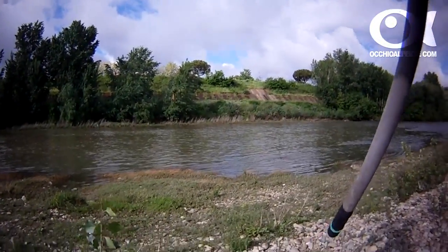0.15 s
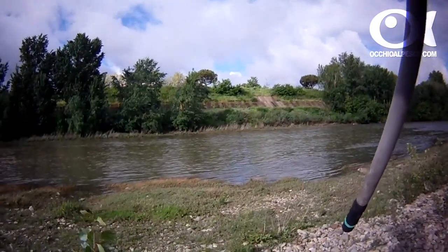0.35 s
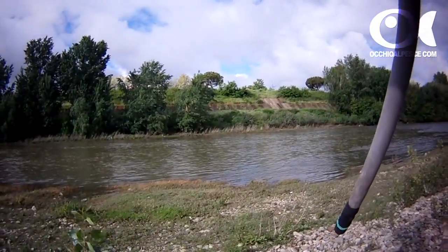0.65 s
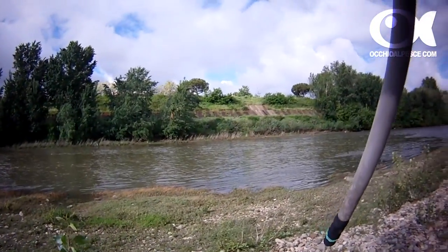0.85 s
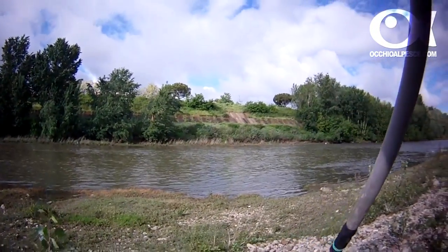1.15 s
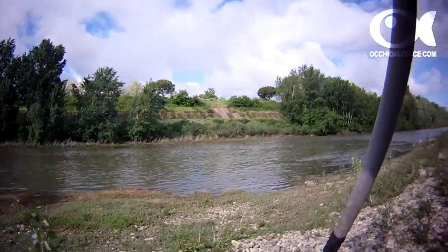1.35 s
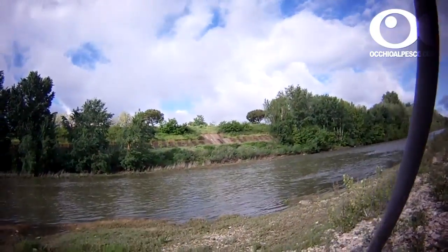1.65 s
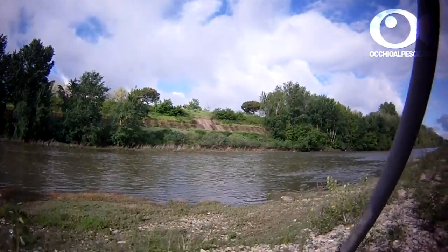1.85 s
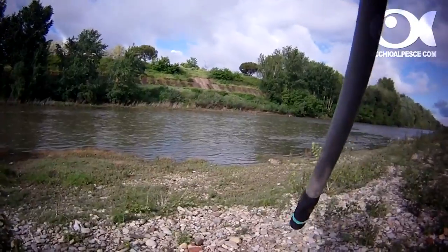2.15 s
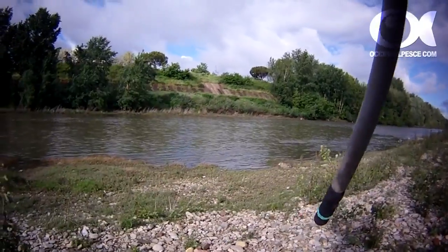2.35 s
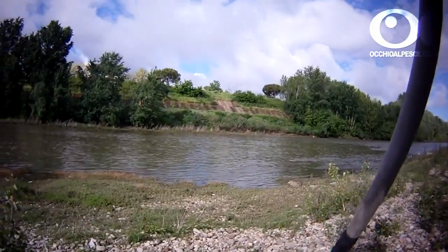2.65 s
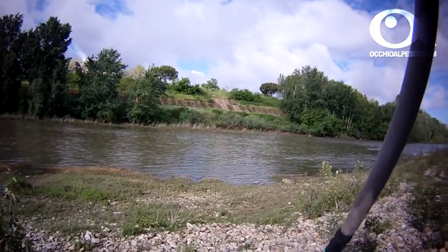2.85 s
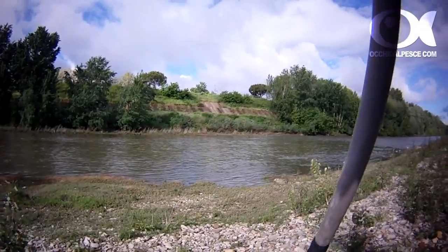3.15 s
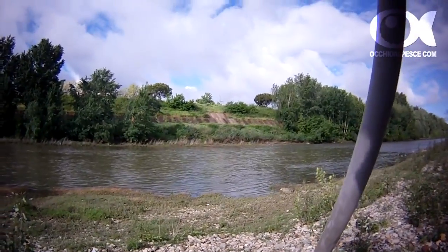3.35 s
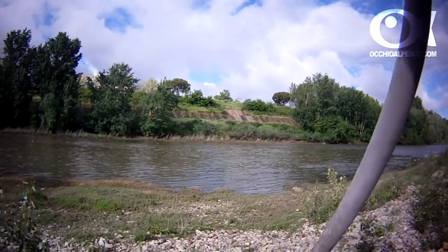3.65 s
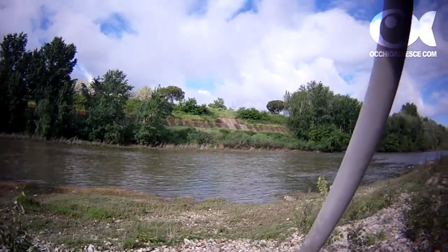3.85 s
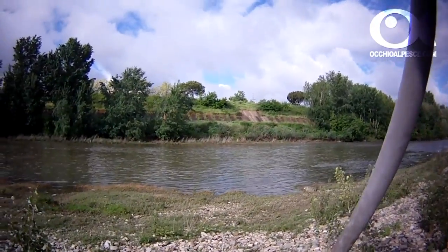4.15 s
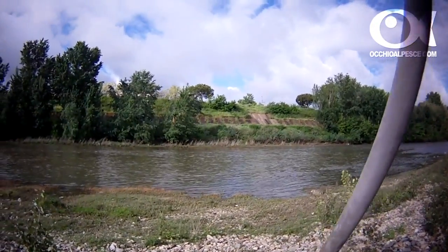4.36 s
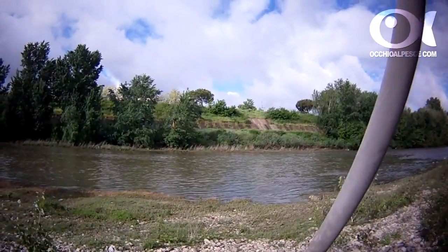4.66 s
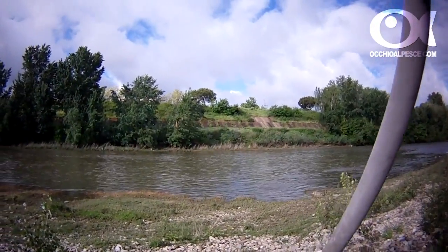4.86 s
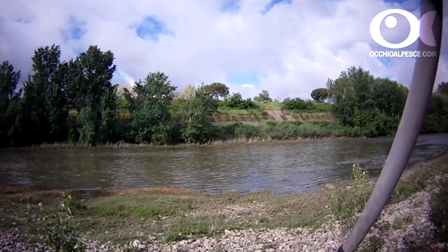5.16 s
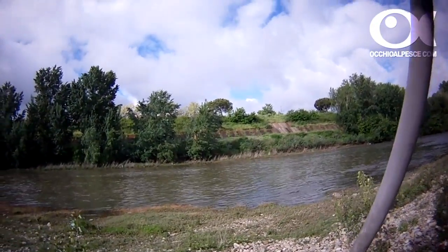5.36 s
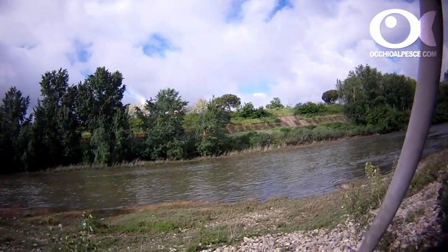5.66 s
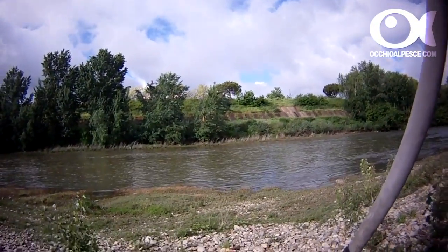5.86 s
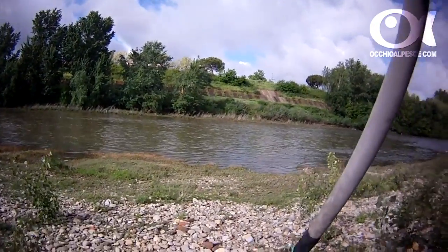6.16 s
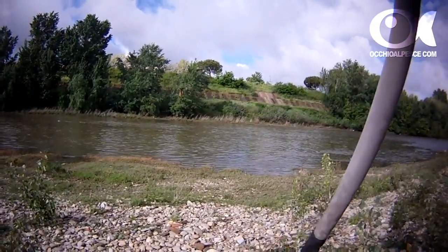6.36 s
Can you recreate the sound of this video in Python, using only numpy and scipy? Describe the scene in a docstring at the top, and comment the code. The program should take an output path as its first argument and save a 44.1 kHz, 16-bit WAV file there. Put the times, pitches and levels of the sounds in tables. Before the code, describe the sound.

Someone shuffles on a pebbly riverbank close to a hand-held microphone. Soles crunch through gravel in irregular bunches, stones clack together and soft footfalls thud, loudest early on and again near the end. Behind them a river murmurs steadily and a small bird whistles in the distance. Light puffs of air touch the microphone, over a faint electronic whine and hiss.

```python
"""A pebbly riverbank, where someone shifts and steps close to a small hand-held camera.
Up front, soles crunch through gravel in bunches of tiny slips, pebbles clack and chatter, and soft
footfalls thud, all coloured by the camera's housing. Behind, the river murmurs and a small bird
whistles far off. Air puffs lightly on the microphone; the electronics whine and hiss faintly."""
import sys
import numpy as np
from scipy import signal
from scipy.fft import rfft, irfft, next_fast_len
from scipy.io import wavfile
from scipy.ndimage import map_coordinates

SR = 44100
rng = np.random.default_rng(int(sys.argv[2]) if len(sys.argv) > 2 else 0)


def output_pcm(signal):
    """Save a mono or channel-first signal as 16-bit PCM at the path in sys.argv[1].

    Samples are clipped to [-1, 1] before scaling.
    """
    pcm = np.clip(np.atleast_2d(signal).T, -1, 1) * 32767
    wavfile.write(sys.argv[1], SR, np.round(pcm).astype(np.int16))


N = 287091

# Table levels are relative: each layer sets its own trim.
# partials of the electronic whine: f/Hz, level/dB
WHINE_PARTIALS = [(7777, -86), (7837, -75), (7867, -84), (7897, -79.5), (7957, -92.5), (11090, -84)]
# tone of the current: f/Hz, level/dB
RIVER_EQ = [(20, -5), (60, -13), (150, -9.5), (330, -7), (480, -5.5), (720, -8), (1200, 3.5), (2100, -5),
            (2600, 0.5), (3000, -2), (3400, 1), (4200, -1), (4900, 1), (6500, -9), (7600, -6.5),
            (9000, -17), (15000, -33)]
# tone of air on the microphone: f/Hz, level/dB
AIR_EQ = [(12, 0.5), (35, -10.5), (90, -24.5), (300, -35), (1000, -100)]
# puffs of air: middle t/s, length/s, level/dB
AIR_PUFFS = [(0.124, 0.26, -68.5), (1.376, 0.195, -63), (1.758, .1, -74), (2.15, 0.5, -75),
             (3.8, 0.22, -72), (5.945, 0.051, -63), (6.073, .14, -61), (6.36, .2, -74.5)]
# bird whistles: start t/s, length/s, start f/Hz, end f/Hz, level/dB
BIRD_NOTES = [(.46, 0.147, 2900, 2806, -69), (0.922, 0.202, 1776, 1905, -69),
              (1.997, 0.04, 2910, 2821, -62), (3.312, 0.048, 4050, 3950, -65),
              (3.742, .06, 3186, 3310, -63), (3.83, .036, 4150, 3800, -63),
              (3.866, 0.059, 3070, 2710, -63.5), (4.007, 0.059, 3400, 3190, -56.5),
              (4.276, 0.0505, 4067, 3680, -62), (4.305, .06, 3750, 4380, -63),
              (4.403, 0.063, 3600, 3170, -58), (4.518, 0.087, 4400, 3334, -57.5),
              (4.808, 0.0355, 2680, 2680, -62), (4.946, 0.043, 4250, 3230, -57),
              (5.015, 0.078, 2600, 2870, -57.5), (5.459, 0.034, 3624, 3200, -59.5),
              (5.513, 0.077, 2660, 2890, -57.5)]
# resonances of the camera housing: f/Hz, width/Hz, level/dB
HOUSING_PEAKS = [(472, 55, -1), (919, 93, 1), (1272, 460, -2), (1594, 166, 0), (2588, 310, -4),
                 (3339, 104, 3.5), (3670, 290, -2.5), (4900, 530, -0.5), (5720, 740, -10.5),
                 (6960, 540, -12.5), (7900, 250, -11.5)]
# the ground thudding under a heel: f/Hz, level/dB, t60/s
GROUND_MODES = [(101.2, -6, 0.041), (172, 2.5, 0.03), (233, 0.5, 0.031)]
# the housing's hollow ring after a footfall: f/Hz, level/dB, t60/s
HOLLOW_MODES = [(467.6, -3, 0.049), (586.7, -8.5, 0.028), (918, -15, 0.042)]
# soft footfalls: t/s, thud level/dB, hollow ring level/dB
FOOTFALLS = [(.948, -69, -53.5), (1.076, -56, -70), (1.113, -49.5, -39.5), (1.23, -45.5, -62),
             (1.753, -54, -54), (2.048, -50, -41.5), (2.192, -47, -55), (2.22, -53, -49), (2.562, -53, -52),
             (2.707, -53, -49), (2.817, -51, -53), (3.036, -49, -41), (3.962, -52, -57), (4.112, -55, -54),
             (4.189, -47, -41), (4.742, -62, -51), (5.308, -49, -58.5), (5.346, -48, -42),
             (5.432, -52, -66), (6.096, -43.5, -40)]
# pebbles knocking together: t/s, level/dB, f/Hz, spread round that pitch/octaves
PEBBLE_HITS = [(.008, -27.5, 3200, 0.68), (0.057, -35.5, 2690, 0.35), (.088, -25.5, 4560, 0.7),
               (.107, -38, 1700, .8), (.1208, -31.5, 4400, 0.31), (0.3227, -25.5, 2490, 0.7),
               (0.3694, -36.5, 1110, 0.45), (.694, -45.5, 1490, 0.63), (1.268, -36, 6000, .9),
               (1.3351, -24, 2240, 0.63), (1.47, -26, 2400, .5), (1.474, -28, 1500, .95),
               (1.514, -34, 1190, 0.66), (1.548, -12.5, 2290, 0.6), (1.5492, -20, 1530, 0.31),
               (1.919, -17.5, 5200, 0.38), (1.935, -27, 4900, 0.62), (2.0624, -39, 1000, 0.43),
               (2.2209, -36.5, 1140, .7), (2.8198, -39, 1400, 0.92), (3.037, -36.5, 2100, 1.1),
               (3.208, -39, 5000, 1.5), (3.29, -40.5, 1510, 0.74), (3.544, -31, 5000, 1.3),
               (3.9698, -33, 3480, .9), (4.0937, -44.5, 1710, 0.26), (4.133, -40, 1610, 1.1),
               (4.1883, -31.5, 1180, 0.63), (4.2, -35, 6870, 0.49), (4.237, -34.5, 1830, 0.49),
               (4.68, -47.5, 900, 0.52), (4.7617, -38, 1310, .8), (5.028, -43, 1300, 0.43),
               (5.0374, -37.5, 1200, .7), (5.0553, -23, 3600, 0.43), (5.0553, -33.5, 1260, 0.3),
               (5.0663, -30.5, 2150, 0.66), (5.0785, -31, 8200, 0.58), (5.13, -29.5, 2933, 0.51),
               (5.238, -38.5, 1600, 0.48), (5.254, -31, 1992, 0.86), (5.2977, -33, 1600, 0.48),
               (5.3864, -33.5, 1770, .55), (5.432, -29.5, 1750, 0.66), (5.8414, -33, 2200, 0.79),
               (6.0048, -25.5, 7200, 0.4), (6.044, -31, 1220, 0.38), (6.091, -35.5, 2400, 1.5)]
# tone of scraping stones: f/Hz, level/dB
GRAVEL_EQ = [(60, -9), (200, -1), (580, 2.5), (750, -7), (900, -3.5), (1400, 1.5), (2050, 3), (3400, 1),
             (4200, 0), (5200, -1), (8000, -3.5), (11000, -3.5), (15000, -21)]
# soles dragging: middle t/s, length/s, level/dB, weight/dB (the lows, relative to that level)
SOLE_DRAGS = [(0.092, 0.17, -53.5, -11), (.211, 0.088, -49.5, -20.5), (0.301, 0.0894, -54.5, -25.5),
              (0.372, 0.092, -55.5, -7.5), (1.122, 0.21, -59.5, -11.5), (1.267, 0.2, -56, -15.5),
              (1.393, .12, -48, -14.5), (1.517, 0.15, -44, -17), (1.717, .1, -54, -10),
              (1.743, 0.041, -44, -27), (1.823, 0.2, -43.5, -17), (1.933, 0.089, -46.5, -10),
              (2.056, 0.15, -52.5, -11), (2.18, .19, -62.5, -16), (2.432, 0.18, -61.5, -9.5),
              (2.618, 0.067, -58.5, -5), (2.826, .1, -52.5, -13.5), (3.061, 0.064, -60.5, -7),
              (3.291, .14, -61.5, -0.5), (3.597, 0.14, -51, -16.5), (3.69, .135, -48.5, -16.5),
              (3.864, 0.088, -54, -14), (3.997, 0.088, -45, -22.5), (4.122, .045, -58, -13),
              (4.196, 0.094, -54.5, -7), (4.955, 0.22, -64.5, -3.5), (5.061, 0.08, -54, -12.5),
              (5.238, 0.12, -57, -6.5), (5.334, 0.13, -46, -7), (5.454, 0.12, -48.5, -11),
              (5.67, 0.16, -53, -13), (5.76, 0.1233, -52.5, -14), (5.837, .1, -45.5, -9.5),
              (5.941, 0.16, -46, -9), (6.002, 0.0834, -45.5, -18), (6.111, 0.057, -51.5, -13),
              (6.335, 0.11, -57.5, -8)]


def amp(db):
    """Decibels to gain."""
    return 10 ** (np.asarray(db) / 20)


def unit(x):
    """Scale to rms 1."""
    return x / np.sqrt(np.mean(x ** 2) + 1e-20)


def eq(points):
    """A gain curve through (f/Hz, level/dB) points on a log frequency axis."""
    f, db = np.transpose(points)
    return lambda hz: amp(np.interp(np.log(hz + 1), np.log(f + 1), db))


def wobble(rate):
    """A smooth random curve, rate knots a second."""
    knots = rng.standard_normal(int(N * rate / SR) + 4)
    return map_coordinates(knots, [np.arange(N) * rate / SR])


def filtered(x, response):
    """Shape x with a gain curve over frequency."""
    size = next_fast_len(N + SR // 2)
    return irfft(rfft(x, size) * response(np.fft.rfftfreq(size, 1 / SR)), size)[..., :N]


def ring(response, size=4096):
    """The minimum-phase impulse response of a gain curve."""
    cepstrum = irfft(np.log(np.maximum(response(np.fft.rfftfreq(size, 1 / SR)), 1e-6)))
    cepstrum[1:size // 2] *= 2
    cepstrum[size // 2 + 1:] = 0
    return irfft(np.exp(rfft(cepstrum)))


def add(track, s, sound):
    """Mix a sound into the track at s seconds."""
    part = track[max(round(s * SR), 0):][:len(sound)]
    part += sound[:len(part)]


def swell(middle, length):
    """A half-sine fade from 0 up to 1 and back."""
    gain = np.zeros(N)
    add(gain, middle - length / 2, np.sin(np.linspace(0, np.pi, int(length * SR))))
    return gain


def grains(rate, spread_db, hiss):
    """Random ticks of uneven size, rate a second, over a smooth hiss."""
    ticks = (rng.random(N) < rate / SR) * rng.standard_normal(N)
    ticks *= amp(spread_db * rng.standard_normal(N).clip(-2, 2))
    return unit(unit(ticks) + hiss * rng.standard_normal(N))


def housing(hz):
    """Gain of the camera body's resonances."""
    return np.sqrt(sum(amp(db) ** 2 / (1 + (2 * (hz - centre) / width) ** 2)
                       for centre, width, db in HOUSING_PEAKS))


def electronics():
    """The camera's noise bed: a thin whine with sidebands, white noise, and each channel's own hiss."""
    t = np.arange(N) / SR
    whine = sum(np.sqrt(2) * amp(db) * np.sin(2 * np.pi * (hz * t + rng.random()))
                for hz, db in WHINE_PARTIALS)
    hiss = filtered(rng.standard_normal((2, N)), eq([(5000, -37), (8500, -1.0), (15000, 6.5)]))
    return amp(-1.0) * whine + amp(-77.5) * hiss + amp(-70.5) * rng.standard_normal(N)


def breeze(lull_db=-82.5):
    """Light air rumbles on the microphone in unsteady puffs."""
    rumble = unit(filtered(rng.standard_normal(N), eq(AIR_EQ)))
    puffs = amp(lull_db) + sum(amp(db) * swell(s, length) for s, length, db in AIR_PUFFS)
    return puffs * amp(1.9 * wobble(29)) * rumble


def river():
    """The current runs as a steady, slightly grainy wash."""
    wash = unit(filtered(grains(rate=1500, spread_db=4.5, hiss=1.64), eq(RIVER_EQ)))
    return amp(-61.0 + 0.28 * wobble(5.1)) * wash


def bird(slur_s=.026, warble_hz=40, flutter_db=2.5, echo_db=-9, echo_t60=.35):
    """Whistles ease onto their last pitch, warbling and fluttering, with a faint tail from the trees."""
    track, waver = np.zeros(N), wobble(260)
    for s, length, start_hz, end_hz, db in BIRD_NOTES:
        progress = np.linspace(0, 1, int(length * SR))
        slur = np.expm1(-progress * length / slur_s) / np.expm1(-length / slur_s)
        pitch = start_hz + (end_hz - start_hz) * slur + warble_hz * waver[int(s * SR):][:len(slur)]
        envelope = amp(db + 3.5) * np.abs(np.sin(np.pi * progress)) ** 0.37
        add(track, s, envelope * np.sin(2 * np.pi * np.cumsum(pitch) / SR))
    track *= amp(flutter_db * wobble(110))
    t = np.arange(SR // 2) / SR
    trees = rng.standard_normal(len(t)) * amp(-60 * t / echo_t60)
    return track + amp(echo_db) * signal.fftconvolve(track, trees / np.linalg.norm(trees))[:N]


def footfalls(attack_s=0.0018, detune=0.028):
    """Each soft step thuds in the ground and rings the housing's lowest resonances."""
    track, t = np.zeros(N), np.arange(SR // 10) / SR

    def struck(modes):
        """Decaying sines, slightly detuned on every step."""
        return sum(amp(db - 60 * t / t60) * np.sin(2 * np.pi * hz * rng.normal(1, detune) * t)
                   for hz, db, t60 in modes)

    for s, thud_db, ring_db in FOOTFALLS:
        thud = amp(thud_db - 5.5) * struck(GROUND_MODES)
        hollow = amp(ring_db + 1.0) * struck(HOLLOW_MODES)
        add(track, s, (thud + hollow) * (1 - np.exp(-t / attack_s)))
    return track


def loose_pebbles(per_s=22, most=8, lift_db=8.5, scatter_db=2.5, centre_hz=3400, spread_octaves=0.54):
    """Drags kick a few pebbles loose, hardest mid-stroke: extra rows for PEBBLE_HITS."""
    pebbles = []
    for s, length, db, _ in SOLE_DRAGS:
        for chance, place, strength, tone in rng.uniform(-1, 1, (most, 4)):
            if abs(chance) < per_s * length / most:
                push_db = 20 * np.log10(np.cos(np.pi * place / 3))
                hit_db = db + push_db + lift_db + scatter_db * strength
                pitch_hz = centre_hz * 2 ** (.9 * tone)
                pebbles.append((s + length * place / 3, hit_db, pitch_hz, spread_octaves))
    return pebbles


def contact(pitch_hz, octaves, skirt_db=-29.5):
    """One stone-on-stone click of peak 1: a hump round its pitch, rung through the housing."""
    hump = lambda hz: np.exp(-.5 * (np.log2((hz + 1) / pitch_hz) / octaves) ** 2) + amp(skirt_db)
    blow = ring(lambda hz: hump(hz) * housing(hz))
    return blow / np.abs(blow).max()


def pebble_clacks(chatter=0.067, chatter_t60=0.025, usual_hit_db=-34):
    """A pebble strikes its neighbour, then chatters for a few milliseconds as it settles."""
    track, t = np.zeros(N), np.arange(SR // 20) / SR
    for s, db, pitch_hz, octaves in PEBBLE_HITS + loose_pebbles():
        blow = contact(pitch_hz, octaves)
        chatter_db = -.15 * (db - usual_hit_db)  # a harder blow rings cleaner
        touches = chatter * rng.standard_normal(len(t)) * amp(chatter_db - 60 * t / chatter_t60)
        touches[0] = 1  # the strike itself
        rattle = signal.fftconvolve(touches, blow)
        rattle *= np.linalg.norm(blow) / np.linalg.norm(rattle)  # chatter only spreads the energy
        add(track, s, amp(db + 1.28) * rattle)
    return track


def drag_colour(weight_db, length, usual_weight_db=-14, usual_length_s=0.13):
    """Power of mids, body, fizz and rasp: weight adds body and smothers the top; long drags rasp."""
    fizz_db = -18 - .33 * weight_db
    rasp_db = -6 + np.log2(length / usual_length_s) - 0.2 * (weight_db - usual_weight_db)
    return amp([-1, weight_db, fizz_db, rasp_db]) ** 2


def gravel_scrapes(body_hz=750, fizz_hz=6000, rasp_hz=3470, rasp_width_hz=560, fidget_db=-70.5):
    """Grit slips under the sole, a four-band crunch that swells and dies with each stroke."""
    power = np.zeros((4, N))
    for s, length, db, weight_db in SOLE_DRAGS:
        stroke = amp(db) * swell(s, length)
        moving = stroke > 0
        power[:, moving] += np.outer(drag_colour(weight_db, length), stroke[moving] ** 2)
    fidget = amp(fidget_db + wobble(11))  # stones never quite rest under a standing foot
    power += np.outer(drag_colour(weight_db=-11, length=0.13), fidget ** 2)

    body = lambda hz: 1 / np.sqrt(1 + (hz / body_hz) ** 10)
    fizz = lambda hz: 1 / np.sqrt(1 + (fizz_hz / (hz + 1)) ** 20)  # sharp sand
    rasp = lambda hz: 1 / np.sqrt(1 + (2 * (hz - rasp_hz) / rasp_width_hz) ** 10)
    mids = lambda hz: np.sqrt(np.abs(1 - body(hz) ** 2 - fizz(hz) ** 2 - rasp(hz) ** 2))

    slips = grains(rate=5000, spread_db=1.5, hiss=0.615)
    slips *= amp(0.98 * wobble(110))  # stones give way in clumps
    stone_ring = ring(lambda hz: housing(hz) * eq(GRAVEL_EQ)(hz))
    crunch = signal.fftconvolve(slips, stone_ring)[:N]
    # each size of stone also catches and lets go on its own
    bands = [unit(filtered(crunch, band) * amp(1.07 * wobble(120))) for band in (mids, body, fizz, rasp)]
    return np.sum(np.sqrt(power) * bands, axis=0)


def scene():
    """Feet, bird, river and air sit dead centre; only the camera's hiss is wide."""
    feet = gravel_scrapes() + pebble_clacks() + footfalls()
    return feet + bird() + river() + breeze() + electronics()


def record(dry, top_hz=15300):
    """The camera's band limit: a brick-wall cut of the highest treble."""
    return filtered(dry, lambda hz: hz < top_hz)


dry = scene()
out = record(dry)
output_pcm(out)
```